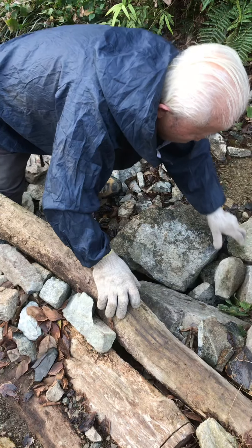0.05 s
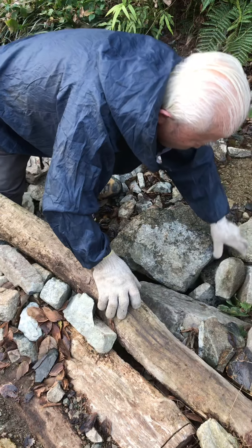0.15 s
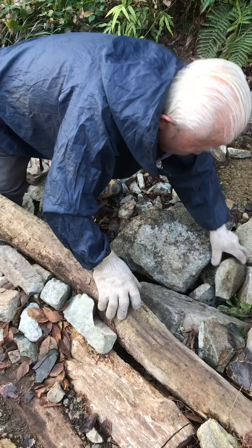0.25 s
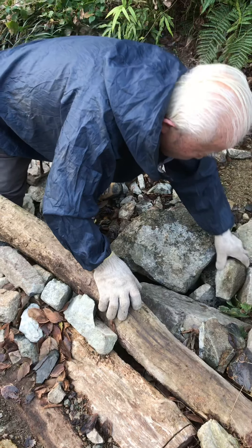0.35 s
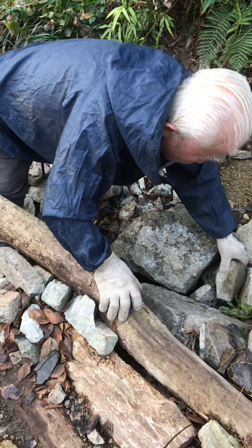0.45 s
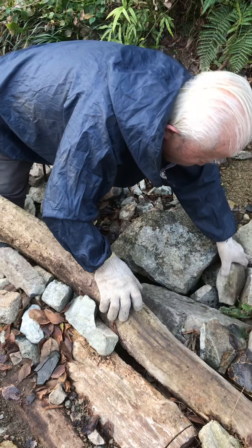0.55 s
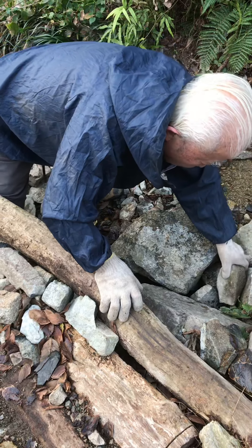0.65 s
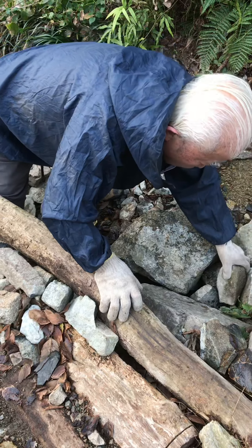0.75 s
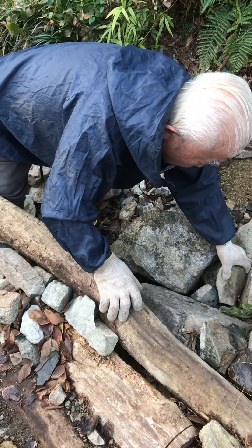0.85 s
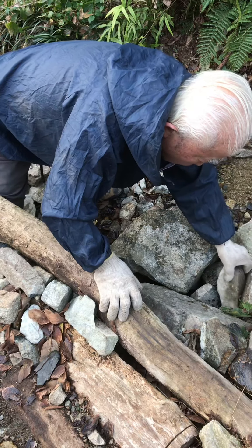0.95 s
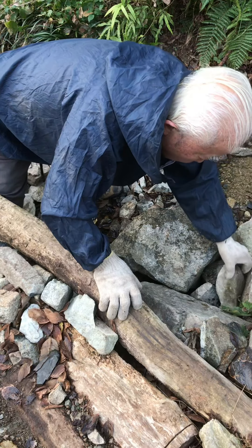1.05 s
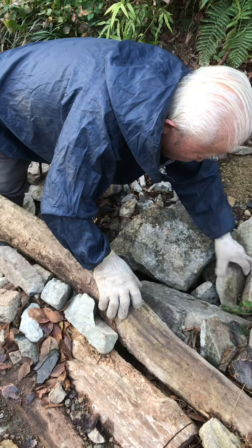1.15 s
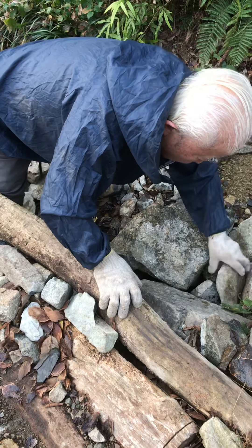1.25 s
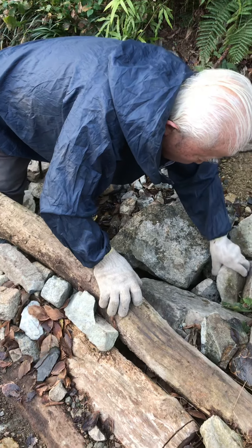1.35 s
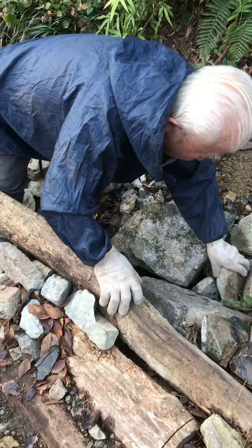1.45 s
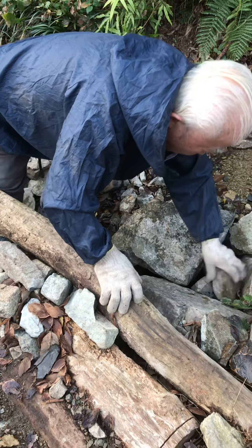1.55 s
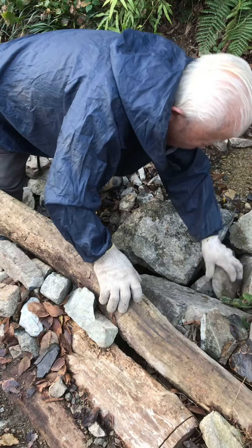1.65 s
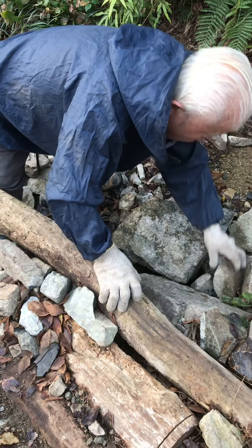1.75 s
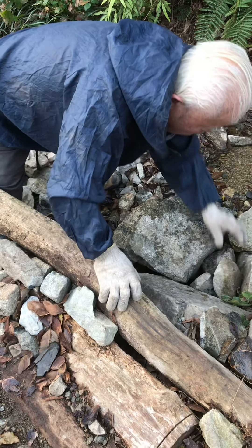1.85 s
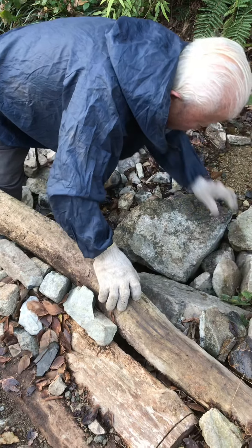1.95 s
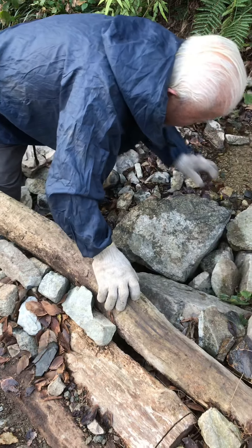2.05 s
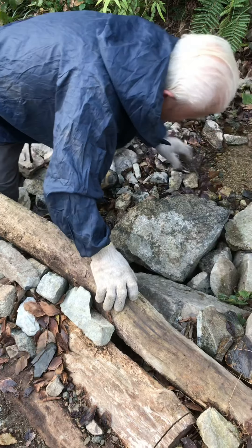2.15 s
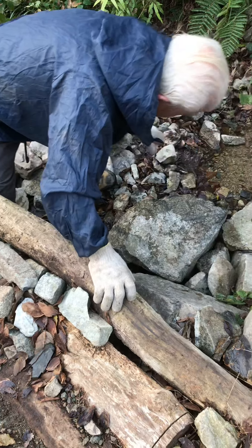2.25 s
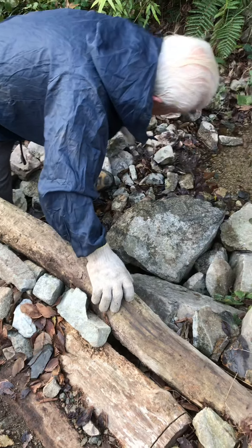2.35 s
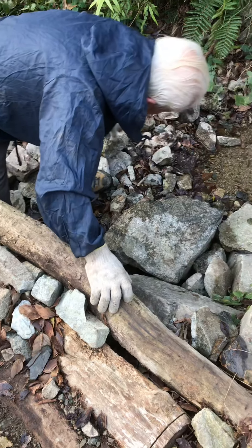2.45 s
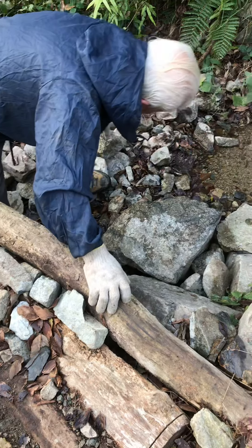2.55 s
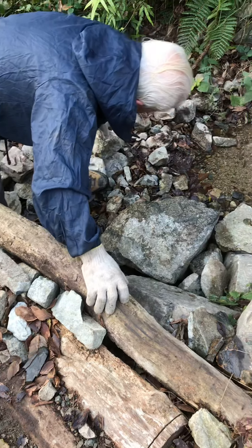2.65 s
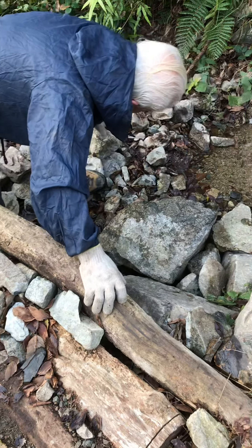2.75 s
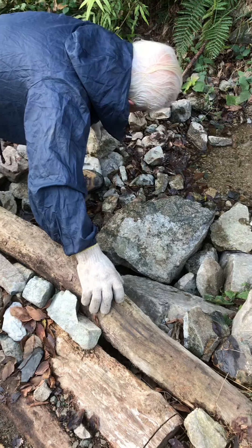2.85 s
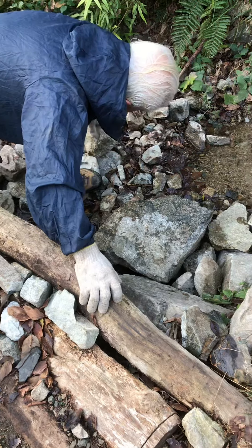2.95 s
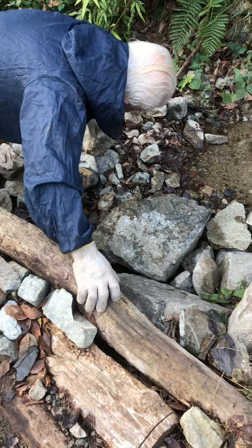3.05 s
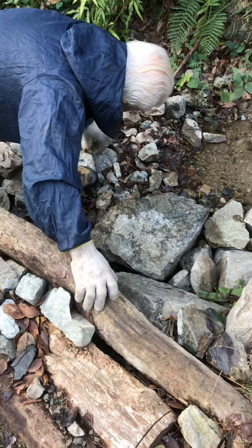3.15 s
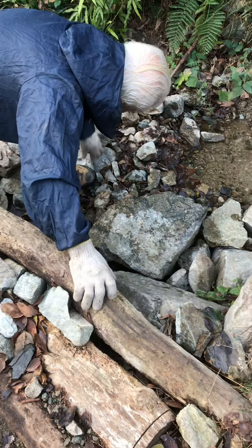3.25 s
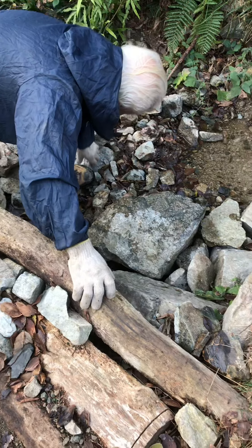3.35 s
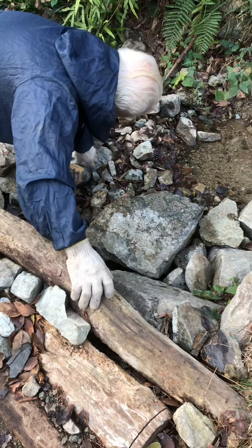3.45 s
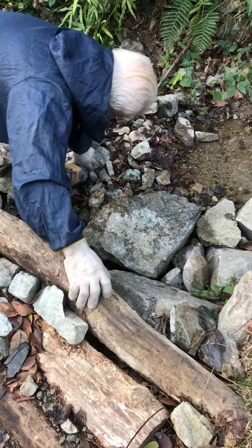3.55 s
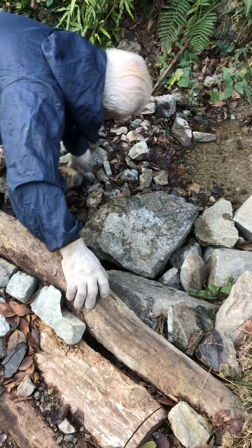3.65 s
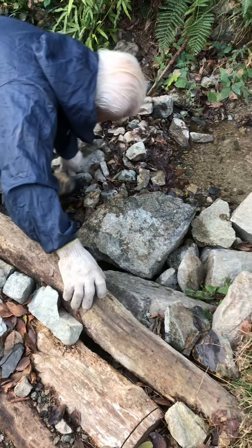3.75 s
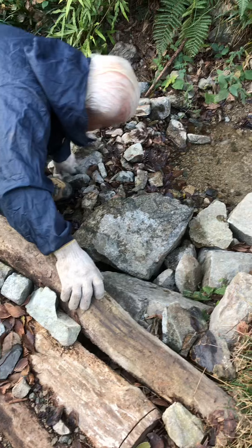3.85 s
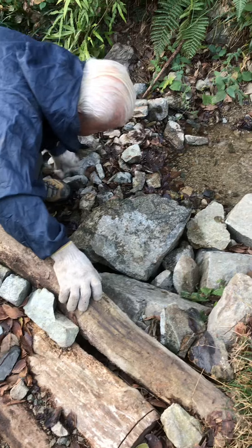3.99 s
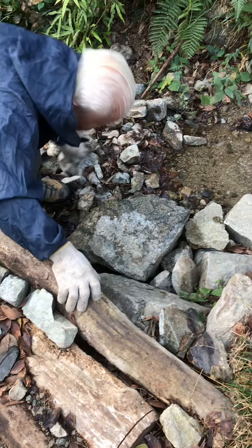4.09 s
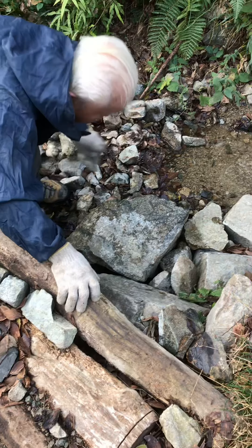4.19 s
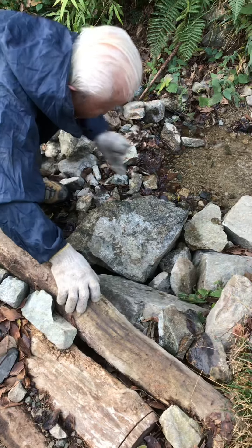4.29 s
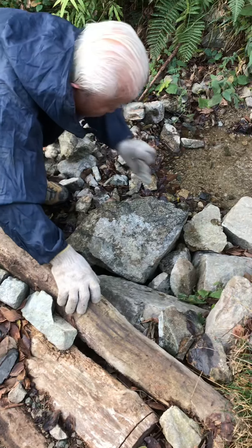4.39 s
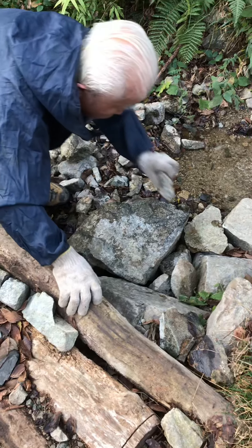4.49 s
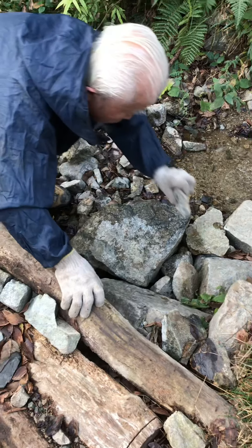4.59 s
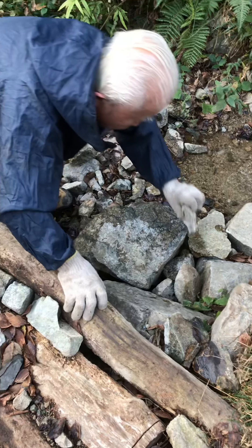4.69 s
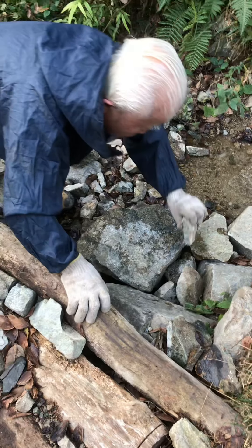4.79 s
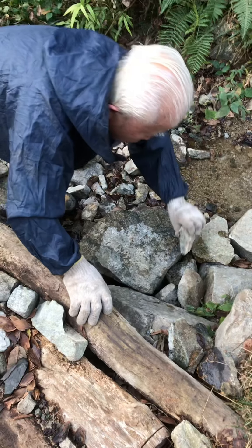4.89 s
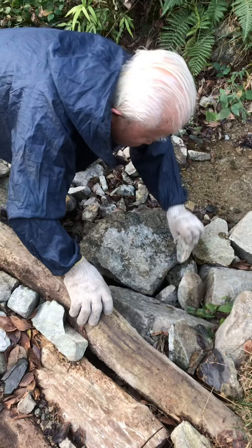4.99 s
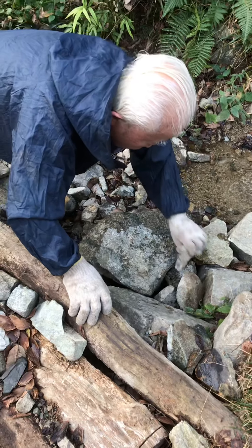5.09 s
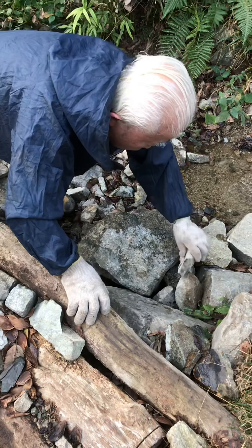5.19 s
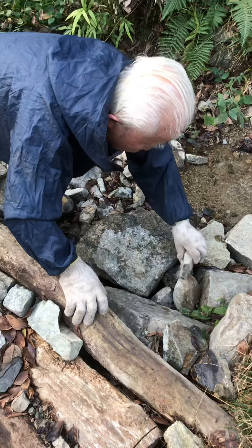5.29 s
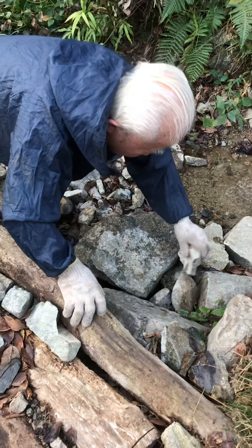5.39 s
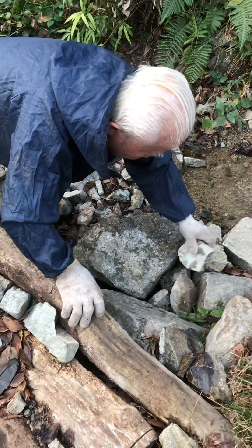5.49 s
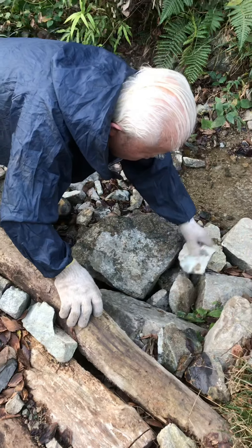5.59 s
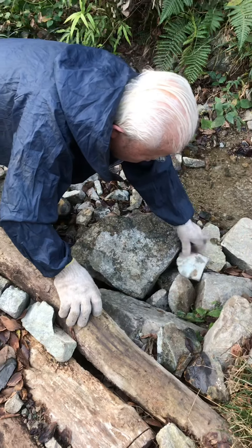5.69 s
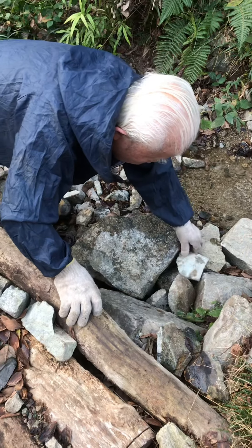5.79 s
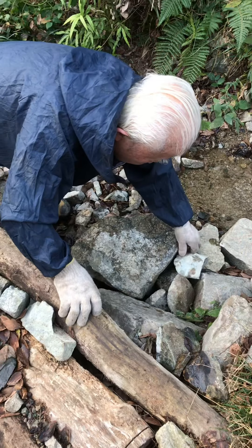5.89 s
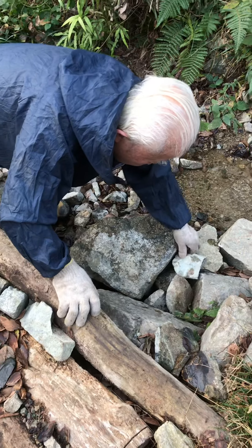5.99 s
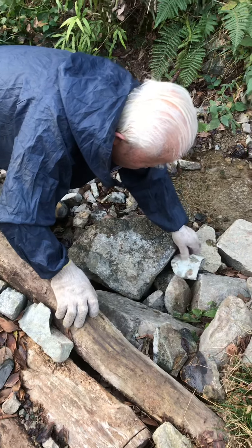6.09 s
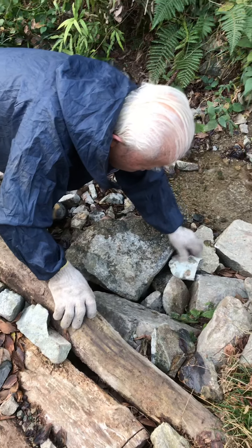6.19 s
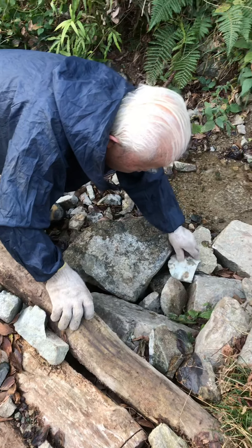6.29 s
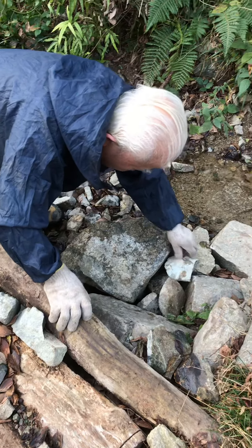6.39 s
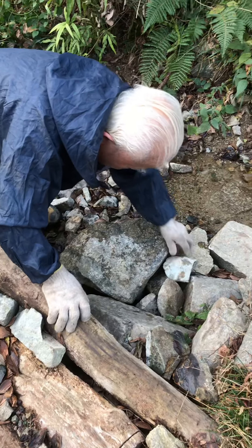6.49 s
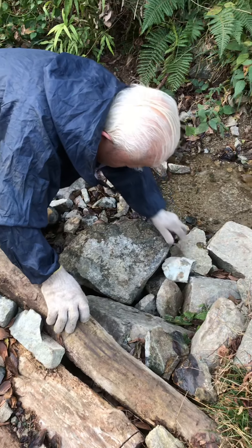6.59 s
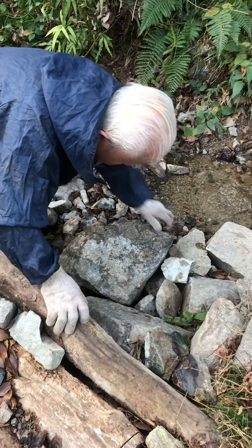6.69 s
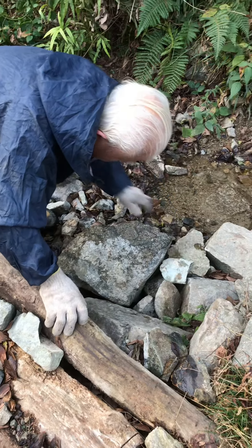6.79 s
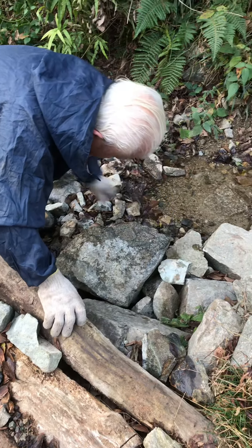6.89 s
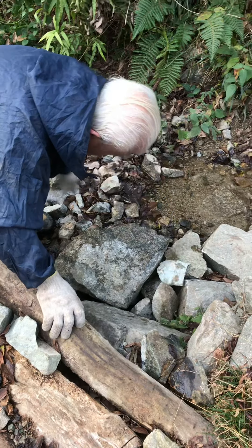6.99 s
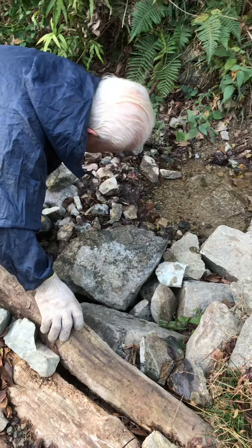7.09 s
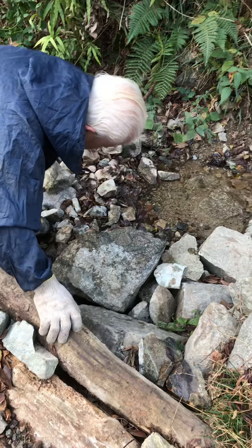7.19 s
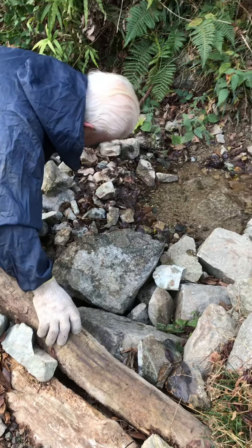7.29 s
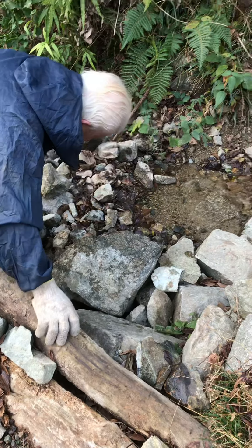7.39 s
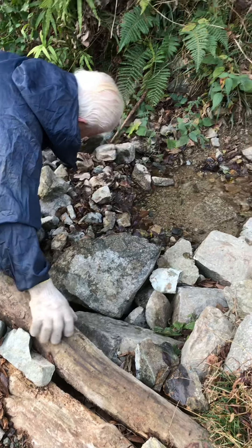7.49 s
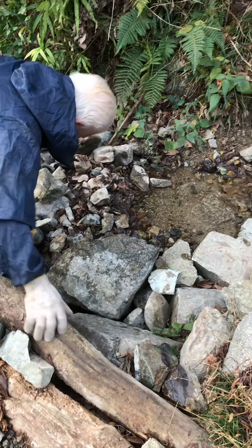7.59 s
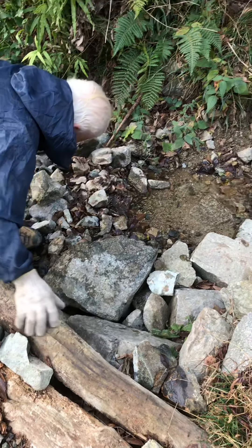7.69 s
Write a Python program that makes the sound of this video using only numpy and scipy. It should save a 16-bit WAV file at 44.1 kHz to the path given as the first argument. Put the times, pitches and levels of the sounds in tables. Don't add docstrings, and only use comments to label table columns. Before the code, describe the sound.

Outdoors on a stream bank, a phone microphone sits an arm's length from the stones. From 0 to 1.7 s a heavy stone bumps and grinds with gritty ticks and glove and sleeve rustle, landing with a dull, full knock at 1.5 s. Thin insect shrilling swells at the start and near 1.6 s. From 1.8 to 3.3 s handling nearly stops; small birds give rising whistles that hang in the trees. At 3.4-4 s pebbles are rummaged, scraping and clinking, with a few light clinks until 4.6 s. A gritty tap comes at 5.0 s amid lively chirps and warbles. At 5.6 s a tap leads into one loud hard clack with quick rebounds, then softer settling knocks to 5.9 s and again around 6.3-6.5 s. One bird repeats a high rising whistle from 5.4 to 6.9 s. Faint snaps and rustle end it near 7.6 s. Soft water hiss and low far rumble persist.

```python
import sys
import numpy as np
from scipy import signal
from scipy.fft import rfft, irfft, next_fast_len
from scipy.io import wavfile
from scipy.ndimage import uniform_filter1d

SR = 44100
rng = np.random.default_rng(int(sys.argv[2]) if len(sys.argv) > 2 else 0)


def store_wav(level_fs):
    pcm = np.round(np.clip(np.atleast_2d(level_fs), -1, 1) * 32767)
    wavfile.write(sys.argv[1], SR, pcm.T.astype(np.int16))


def nominal_scale(level):
    x = np.asarray(level, float) / 20
    return 10 ** x


N = 341334


def knocks(events, body, fall=0.72, blow_cycles=0.6, crack_s=0.012, soft=0.28, detune=0.06, rise=1.18,
           near_db=-3):
    out, t = np.zeros(N), np.arange(3000) / SR
    for s, db, hz, ring_db, crack_db in events:
        cycles = t * hz
        swing = cycles / blow_cycles
        blow = -np.sin(2 * np.pi * 1.201 * cycles ** fall) * swing ** rise * np.exp(1 - swing ** 1.15)
        push = np.exp(-((cycles[:200] - 1) / soft) ** 2)
        place = rng.standard_normal((len(body), 2))
        modes = [(f * (1 + detune * a), g + 2.9 * b, t60) for (f, g, t60), (a, b) in zip(body, place)]
        low = np.convolve(ring(t, modes), push / push.sum())[:len(t)]
        grit = shape(rng.standard_normal(len(t)), [(1500, -16), (3500, -8), (7000, -3), (14000, -11)])
        crack = grit * nominal_scale(-60 * t / crack_s) * np.minimum(cycles, 1)
        rocks_nearby = signal.fftconvolve(blow, tail(0.053, size=2000))[:len(t)]
        blow += nominal_scale(near_db) * rocks_nearby
        knock = blow + nominal_scale(ring_db) * low + nominal_scale(crack_db - 9.5) * crack
        add(out, s + 0.001, nominal_scale(db) * knock)
    return out


# t/s, peak level/dB, blow f/Hz, body ring level/dB, crack level/dB
CLACK = [
    (5.63925, 0, 1215, -12.5, -16),
    (5.6436, -15.5, 1157, -15, -25),
    (5.65030, -15.5, 1340, -14.5, -23),
]
# f/Hz, level/dB, t60/s
STRUCK_STONE = [(700, -3, .035), (909.5, -5, .025), (1210, -8.5, .022), (1630., -9.5, 0.01),
                (2400, -1, 0.012), (2900, 0.5, .014), (3600, -6, .010), (4200., -11.5, 0.014),
                (6300., -15, 0.015)]


def clack():
    return knocks(CLACK, STRUCK_STONE, fall=0.72, blow_cycles=1.0, crack_s=0.041, soft=0.055,
                  detune=0.013, rise=0.4, near_db=-9)


# t/s, peak level/dB, blow f/Hz, body ring level/dB, crack level/dB
DRAGGED = [(0.445, -39, 910, -20, -26), (0.457, -33, 776, -3, -27), (0.465, -32, 660, -1, -20),
           (0.912, -36.5, 770, -6, -13), (0.968, -35.5, 965, -5, -6), (1.012, -42, 950, -20, -10),
           (1.05, -62, 1630, -13, -5.5), (1.34, -53, 950, -10, -10), (1.42, -45, 678, 4, -21),
           (1.443, -28, 780, -7, -26), (1.454, -44, 660, -14, -10), (1.47, -46, 616, -19, -16),
           (1.476, -33, 950, 7, -28), (1.654, -41.5, 700, -38, -18.5), (1.698, -47.5, 746, -14, -23),
           (3.801, -36.5, 630, 2.5, -23)]
DROPPED = [
    (1.4904, -23, 1600, -8, -34),
    (1.4948, -17.5, 900, -3, -36),
    (1.4985, -23, 750, 0, -36),
    (1.5050, -27, 1150, 3, -32),
]
# f/Hz, level/dB, t60/s
BIG_STONE = [(303, -17, 0.1), (388, -3, 0.021), (642, -6.5, 0.038), (950, -8, 0.039), (1430, -31, 0.025),
             (1650, -17, 0.033), (2030, -23, 0.08)]


def big_stone():
    dropped = knocks(DROPPED, BIG_STONE, fall=0.72, blow_cycles=1.0, rise=0.95, near_db=-2.5)
    return knocks(DRAGGED, BIG_STONE) + dropped


# t/s, peak level/dB, blow f/Hz, body ring level/dB, crack level/dB
TAPPED = [
    (5.0042, -21, 1130., -7, 5),
    (5.6020, -22, 1020., -10.5, 4),
    (5.6805, -28, 800., -5, -31),
]
# f/Hz, level/dB, t60/s
FLAT_STONE = [(282, 2.5, .014), (419, -1.5, 0.023), (765, -7.5, 0.022), (988., -16, .020),
              (1680., -3, 0.023)]


def flat_stone():
    return knocks(TAPPED, FLAT_STONE)


# t/s, peak level/dB
SETTLING = [(5.829, -33.5), (5.856, -37), (5.882, -40), (5.895, -46), (5.909, -56), (6.067, -77.5),
            (6.344, -27), (6.38, -47.5), (6.432, -42), (6.457, -65), (6.492, -52.5), (6.529, -71.5)]
# f/Hz, level/dB, t60/s
PERCHED_STONE = [(286, -14.5, 0.081), (416, -6, 0.018), (670, 0, 0.045), (910, -8, 0.066),
                 (1470, -5, 0.017), (1890, -10, 0.031)]


def settling_stone():
    events = alike(SETTLING, hz=1095, ring_db=3.5, crack_db=-15, gentle=0.62)
    return knocks(events, PERCHED_STONE, fall=0.69, blow_cycles=0.77, detune=0.02)


# t/s, peak level/dB, body ring level/dB, crack level/dB
RUMMAGED = [(3.573, -41, -19, -5), (3.589, -42, -23, 0), (3.636, -34.5, -6.5, -12.5), (3.659, -40, -13, -2),
            (3.702, -48, 5, -4.5), (3.763, -37, -2, -20.5), (3.864, -38, -9, -23), (3.895, -41.5, -19, -17),
            (3.91, -43, -12, -18), (3.925, -41.5, -13, -15), (3.552, -50, -13, -12), (3.939, -39, -30, -10),
            (3.961, -37, -28, -7)]
CLINKED = [
    (3.746, -33, -38, -19),
    (3.754, -31, -29, 9),
    (3.845, -33.5, -13.5, -23),
    (3.85, -39, -12, -22),
    (4.007, -48, -11, -24),
    (4.408, -42, -7.5, -10),
    (4.632, -40.5, -11.5, 1),
    (6.4025, -37, -18, 3),
    (4.578, -37, -15.5, 2.5),
    (4.607, -44, -29, -2),
]
# t/s, peak level/dB
SNAPPED = [
    (6.2781, -50),
    (6.2866, -41.5),
    (6.2992, -52),
    (7.5711, -47.5),
    (7.6156, -44.5),
    (7.6214, -45),
    (7.6298, -40),
    (7.6374, -51),
]
# f/Hz, level/dB, t60/s
PEBBLES = [(372, -4.5, 0.027), (872, -1, 0.0094), (930, -1, 0.045), (1520, -3, 0.031), (2410, -4.5, 0.032),
           (2740, -15.5, 0.019)]


def pebbles():
    turned = pitched(RUMMAGED, hz=1060) + pitched(CLINKED, hz=2200)
    snapped = alike(SNAPPED, hz=2610, ring_db=-11, crack_db=1, gentle=0.5)
    out = knocks(turned, PEBBLES, fall=0.76, blow_cycles=0.62, detune=0.026)
    return out + knocks(snapped, PEBBLES)


def pitched(rows, hz):
    return [(s, db, hz, ring_db, crack_db) for s, db, ring_db, crack_db in rows]


def alike(rows, hz, ring_db, crack_db, gentle):
    return [(s, db, hz, ring_db - gentle * (db + 41), crack_db) for s, db in rows]


# t/s, peak level/dB, f/Hz
TICKS = [(0.0362, -45.5, 6500), (0.0498, -46.5, 6500), (0.35, -47, 9550), (0.7697, -46, 7300),
         (0.7875, -44, 9310), (0.8712, -37, 11900), (1.004, -39, 8060), (1.039, -49, 6600),
         (1.6417, -43, 7250), (.0655, -55, 6500), (1.918, -50.5, 6000), (2.168, -56, 6800),
         (2.55, -62, 7500), (2.62, -59, 5480), (2.648, -63, 8000), (2.748, -62, 5500), (7.573, -51.5, 4300),
         (7.6164, -43.5, 4430), (7.63, -50, 3020), (3.155, -53, 4670), (3.343, -39, 4500),
         (3.571, -35, 4930), (3.657, -32.5, 7740), (3.675, -31.5, 4630), (3.413, -54, 6200),
         (3.515, -49, 5000), (3.5329, -44.5, 7050), (4.366, -51, 5230), (1.05, -45.5, 5300),
         (6.3634, -45, 5300), (6.3691, -34.5, 9100), (6.374, -49, 5500), (6.385, -42, 5400),
         (6.4335, -51, 5940), (7.041, -43, 7060)]
# t/s, level/dB
CHIP = [
    (5.005, -38.5),
    (5.603, -39),
    (5.667, -55.5),
    (5.693, -54.5),
]
# f/Hz, level/dB, t60/s
CHIP_MODES = [(8570, -4, 0.045), (8670, -3.5, .05), (8400, -8.5, 0.015), (12360, -12.5, .04)]


def grit():
    out, t = np.zeros(N), np.arange(3000) / SR
    for s, db, hz in TICKS:
        colour = [(0.59 * hz, -18), (hz, 0), (1.18 * hz, -10), (16000, -11)]
        snap = shape(rng.standard_normal(len(t)), colour) * nominal_scale(-60 * t / 0.011)
        add(out, s, nominal_scale(db + 9) * snap)
    for s, db in CHIP:
        add(out, s, nominal_scale(db) * ring(t, CHIP_MODES))
    return out


def stones_on_bank():
    stones = clack() + big_stone() + flat_stone() + settling_stone() + pebbles() + grit()
    stones = signal.sosfilt(signal.butter(3, 200, "high", fs=SR, output="sos"), stones)
    return stones + nominal_scale(-42) * signal.fftconvolve(stones, tail(0.3, size=20000))[:N]


# t/s of the peak, level/dB, swell/s, fade/s (over 20 dB)
GRIND = [(.462, -43, 0.08, .09), (.92, -40.5, 0.13, 0.091), (1.016, -35.5, 0.073, 0.031),
         (1.342, -47, .006, 0.075), (1.448, -32, 0.017, 0.13), (1.49, -42, 0.12, .07),
         (1.66, -38, 0.05, 0.018), (1.7, -44, 0.023, 0.034), (3.584, -47, 0.15, 0.09),
         (3.638, -46.5, 0.019, 0.014), (3.66, -44.5, 0.012, 0.35), (3.752, -37, 0.05, 0.042),
         (3.946, -54, 0.48, 0.049), (5.9, -57.5, 0.21, 0.018)]


def grinding():
    t = np.arange(3000) / SR
    big = np.arange(N) < 3 * SR
    stone, drag = np.zeros(N), strokes(GRIND)
    for mask, body in ((big, BIG_STONE), (~big, PEBBLES)):
        for shift in (0.92, 0.98, 1.03, 1.09):
            slips = grains(260, 3.4) * drag * mask
            held_body = [(hz * shift, db, 0.55 * t60) for hz, db, t60 in body]
            stone += signal.oaconvolve(slips, ring(t, held_body))[:N]
    return nominal_scale(-9) * shape(stone, [(120, -7.5), (260, -4)])


# t/s of the peak, level/dB, swell/s, fade/s (over 20 dB)
RUSTLE = [(.054, -64.5, 0.11, 0.017), (.366, -59.5, 0.21, 0.021), (.5, -61.5, 0.24, 0.027),
          (.6, -66.5, 0.16, 0.12), (.792, -60, 0.2, 0.11), (.882, -51.5, 0.12, 0.14),
          (.92, -52, .05, 0.092), (1.09, -68, .04, .03), (1.01, -51, 0.063, 0.047),
          (1.268, -62, 0.055, .12), (1.35, -59, 0.035, 0.087), (1.485, -44.5, 0.083, 0.072),
          (1.52, -47.5, .1, 0.068), (1.56, -49.5, 0.19, 0.037), (1.648, -55, 0.087, 0.088),
          (3.418, -67, 0.041, 0.14), (3.572, -52.5, 0.084, 0.12), (3.665, -46.5, 0.082, 0.1),
          (3.754, -53.5, 0.47, 0.044), (3.936, -64, 0.35, .03), (3.958, -50, 0.019, 0.037),
          (4.41, -68.5, 0.12, 0.28), (4.632, -64.5, .005, .03), (5.14, -64, 0.093, 0.38),
          (5.67, -55, 0.0042, 0.061), (5.894, -62, 0.25, 0.0097), (6.294, -62, 0.1, 0.013),
          (6.376, -62, 0.034, 0.14), (6.6, -72, 0.029, .2), (6.668, -64, 0.21, 0.04), (7.574, -68, .1, .01),
          (7.634, -58, 0.021, .014)]
# f/Hz, level/dB per Hz
CLOTH = [(710, -28), (1200, -10), (2710, -6), (3550, -2), (4800, -3.5), (8000, -3.5), (13500, -5),
         (16000, -5.5)]
FOLDS_HZ = [1500, 3500, 6000, 9500, 13500]


def rustle():
    crackle = unit(grains(3000, 3))
    hiss = unit(shape(crackle + 1.3 * rng.standard_normal(N), CLOTH))
    folds = np.zeros(N)
    for hz in FOLDS_HZ:
        folds += shape(hiss, [(hz / 1.8, -20), (hz, 0), (hz * 4.8, -20)]) * nominal_scale(2 * walk(25))
    cloth = unit(0.5 * hiss + folds) * nominal_scale(1.5 * walk(60) + 3)
    return cloth * strokes(RUSTLE)


# t/s, length/s, top f/Hz
SONG = [
    (5.449, 0.15, 6520),
    (5.75, 0.14, 6070),
    (6.019, 0.14, 6030),
    (6.285, 0.12, 5907),
    (6.547, 0.15, 6010),
    (6.846, 0.13, 5990),
]
# t/s, length/s, first f/Hz, last f/Hz, level/dB
RISING = [
    (0.711, 0.065, 3200, 4780, -67),
    (1.817, 0.12, 2900, 4580, -55),
    (2.04, 0.1, 2600, 3800, -73),
    (2.102, 0.11, 2745, 5520, -58),
    (2.386, 0.063, 3250, 4020, -73),
    (3.42, 0.083, 2950, 4460, -63),
    (4.063, .089, 3020, 3953, -56),
    (5.089, 0.013, 3160, 4830, -61),
    (5.097, 0.135, 2750, 6240, -54),
]
# t/s, length/s, first f/Hz, last f/Hz, level/dB
HELD = [
    (4.882, 0.073, 2697, 2395, -58.5),
]
# t/s, length/s, first f/Hz, last f/Hz, level/dB
SLIDES = [
    (1.135, 0.011, 3600, 2900, -68),
    (2.06, .008, 4220, 3400, -63),
    (4.713, 0.035, 2520, 2837, -65.5),
    (5.22, 0.037, 4800, 3084, -58),
    (6.95, .08, 3530, 3530, -69),
]
# t/s, length/s, first f/Hz, level/dB
PEEPS = [
    (2.878, 0.034, 3850, -68),
    (4.219, 0.079, 2540, -74.5),
    (4.341, 0.061, 2950, -64),
    (4.691, 0.03, 2580, -64),
    (5.355, 0.046, 1920, -63),
    (7.049, 0.062, 3570, -72.5),
]


def calls():
    song = [(s, length, 3000, top_hz, -56, 2) for s, length, top_hz in SONG]
    rising = [(*row, 2.2) for row in RISING]
    held = [(*row, 4.7) for row in HELD]
    slides = [(*row, 0.98) for row in SLIDES]
    peeps = [(s, length, hz, 0.92 * hz, db, 0.98) for s, length, hz, db in PEEPS]
    return song + rising + held + slides + peeps


# t/s, length/s, first f/Hz, last f/Hz, level/dB
NEAR_NOTES = [
    (2.232, .016, 1650, 1550, -60),
    (3.026, .012, 2100, 2100, -66),
    (4.512, .036, 4700, 1600, -67),
    (2.61, .08, 3330, 3520, -68),
    (4.955, .05, 3700, 3690, -68),
    (5.03, .035, 2450, 2430, -68),
    (5.075, .045, 2050, 2420, -63),
    (5.27, .058, 3300, 2960, -48),
    (6.222, .056, 3520, 3580, -57),
]
# t/s, f/Hz
WARBLE = [
    [(5.112, 2590), (5.135, 2540), (5.16, 2200), (5.185, 2060), (5.212, 2120)],
    [(5.488, 2620), (5.505, 2460), (5.535, 2900), (5.56, 2600), (5.575, 2550), (5.6, 2800)],
    [(4.378, 2730), (4.395, 3400), (4.415, 3860), (4.44, 4130), (4.465, 4290), (4.495, 4710), (4.52, 5100)],
    [(4.42, 2550), (4.432, 3300), (4.455, 3750), (4.465, 4200), (4.5, 4340)],
    [(6.697, 2465), (6.712, 3250), (6.74, 3620), (6.775, 3660), (6.8, 3600), (6.83, 3603)],
]
WARBLE_DB = [-53, -52, -49, -48.5, -51]


def open_birds():
    near = sing([(*row, 0.98) for row in NEAR_NOTES])
    for rows, db in zip(WARBLE, WARBLE_DB):
        s, hz = np.transpose(rows)
        t = np.arange(s[0], s[-1], 1 / SR)
        swell = signal.windows.tukey(len(t), 0.55)
        add(near, s[0], whistle(np.interp(t, s, hz), nominal_scale(db) * swell))
    throat = [(2800, -28), (3300, -15), (4300, -13), (4750, -3), (5200, -18), (6800, -22), (7500, -35)]
    rasp = shape(rng.standard_normal(1800), throat)
    add(near, 7.405, nominal_scale(-57) * unit(rasp) * np.hanning(len(rasp)))
    return near


# t/s, length/s, first f/Hz, last f/Hz, level/dB
HIDDEN = [
    (2.928, 0.027, 3700, 3300, -69),
    (2.937, 0.047, 3900, 4600, -62),
    (1.815, 0.083, 3800, 7000, -70),
    (2.906, 0.057, 2865, 4900, -61),
    (2.93, 0.091, 4100, 6400, -64.5),
    (2.937, 0.077, 3550, 4600, -63.5),
    (7.29, 0.074, 2600, 4890, -74.5),
    (6, 0.1, 3400, 2700, -58),
]
# f/Hz, level/dB
TREES = [(1800, -6), (3000, -1), (3800, -0.5), (6500, -3.5)]


def birds():
    whistles, near, hidden = sing(calls()), open_birds(), sing([(*row, 0.98) for row in HIDDEN])
    early = nominal_scale(-4) * tail(0.16, size=40000)
    late = nominal_scale(-4.5) * tail(0.83, size=40000)
    trees = shape(early + late, TREES)
    echo = signal.fftconvolve(whistles + hidden + nominal_scale(-10) * near, trees)[:N]
    direct = (nominal_scale(-6) * whistles + near) * nominal_scale(3.1 * walk(150))
    return direct + nominal_scale(9.5) * echo * nominal_scale(4.5 * walk(30))


def sing(rows):
    out = np.zeros(N)
    for s, length, first_hz, last_hz, db, bend in rows:
        u = np.arange(int(length * SR)) / (length * SR)
        swell = np.clip(np.minimum(u / 0.2, (1 - u) / 0.26), 0, 1)
        glide = first_hz + (last_hz - first_hz) * (1 - (1 - u) ** bend)
        add(out, s, whistle(glide, nominal_scale(db) * swell))
    return out * nominal_scale(2 * walk(120))


def whistle(hz, size):
    waver = uniform_filter1d(rng.standard_normal(len(hz)), size=150) * np.sqrt(150)
    phase = 2 * np.pi * np.cumsum(hz * (1 + 0.007 * waver)) / SR
    return size * (np.sin(phase) + nominal_scale(-24) * np.sin(2 * phase) + nominal_scale(-34.5) * np.sin(3 * phase))


# t/s of the peak, level/dB, swell/s, fade/s (over 20 dB)
SHRILL = [
    (.08, -69.5, .5, .4),
    (.3, -79, 0.51, 1.),
    (1.6, -67, 0.27, 0.33),
]
# f/Hz, level/dB
SHRILL_BAND = [(2900, -28), (3400, 0), (3900, 3), (4500, -20)]


def insects():
    return unit(shape(rng.standard_normal(N), SHRILL_BAND)) * strokes(SHRILL) * nominal_scale(3 * walk(27.7))


# f/Hz, level/dB per Hz
BANK = [(88, -29.5), (150, 1), (291, -3), (662, -13), (2100, -18.5), (4080, -19), (8000, -31), (16000, -28)]


def stream():
    return unit(shape(rng.standard_normal(N), BANK)) * nominal_scale(-63.5 + 0.92 * walk(5.1))


# f/Hz, level/dB per Hz
RUMBLE = [(20, -30), (35, -9.5), (50, 0.5), (61, 1.5), (75, -4.5), (100, -4), (140, -16.5), (250, -41.5)]


def far_rumble():
    return unit(shape(rng.standard_normal(N), RUMBLE)) * nominal_scale(-56.5 + walk(3.8))


def shape(x, points):
    hz, db = np.transpose(points)
    size = next_fast_len(len(x))
    f = np.fft.rfftfreq(size, 1 / SR) + 1
    gain = nominal_scale(np.interp(np.log(f), np.log(hz), db))
    return irfft(rfft(x, size) * gain, size)[:len(x)]


def unit(x):
    return x / np.sqrt(np.mean(x ** 2))


def add(track, s, x):
    i = int(s * SR)
    track[i:i + len(x)] += x[:len(track) - i]


def ring(t, modes):
    return sum(nominal_scale(db) * np.sin(2 * np.pi * hz * t) * nominal_scale(-60 * t / t60) for hz, db, t60 in modes)


def walk(rate):
    k = int(SR / rate)
    held = np.repeat(rng.standard_normal(N // k + 1), k)
    return 0.57 * uniform_filter1d(uniform_filter1d(held, k), k)[:N]


def grains(rate, scatter_db):
    hits = (rng.random(N) < rate / SR) * rng.standard_normal(N)
    return hits * nominal_scale(scatter_db * np.minimum(rng.exponential(size=N), 3.5))


def tail(t60, size):
    echo = rng.standard_normal(size) * nominal_scale(-60 * np.arange(size) / SR / t60)
    return echo / np.sqrt(np.sum(echo ** 2))


def strokes(rows):
    t, db = np.arange(N) / SR, np.full(N, -200.0)
    for s, peak_db, swell, fade in rows:
        db = np.maximum(db, peak_db - 20 * np.maximum((s - t) / swell, (t - s) / fade))
    return nominal_scale(db)


def scene():
    close = stones_on_bank() + grinding() + rustle()
    return (close + birds() + insects() + stream() + far_rumble())[None]


def band_limit(x):
    return signal.sosfilt(signal.butter(12, 15850, fs=SR, output="sos"), x)


# f/Hz, level/dB
MIC = [(9300, -1), (10300, -6.5), (11300, -3), (15500, -7), (16000, -10.5)]


def record(dry):
    mix = shape(dry[0], MIC)[None]
    return band_limit(mix)


dry = scene()
out = record(dry)
store_wav(out)
```